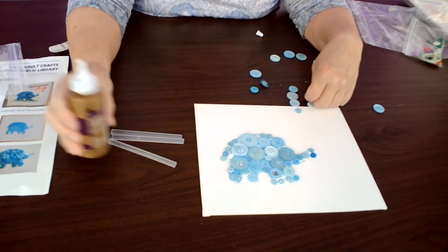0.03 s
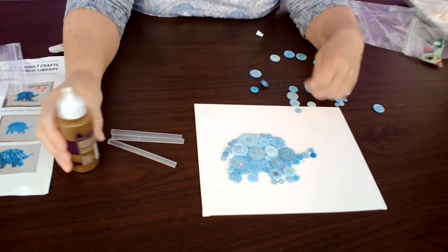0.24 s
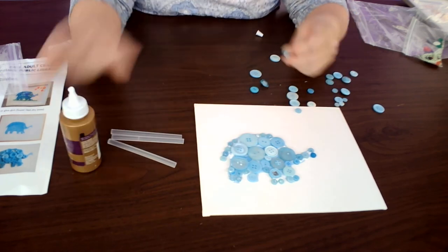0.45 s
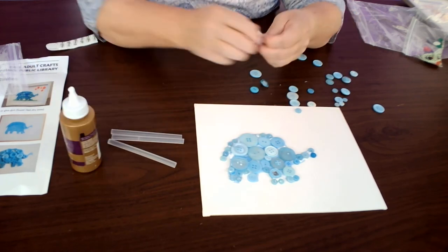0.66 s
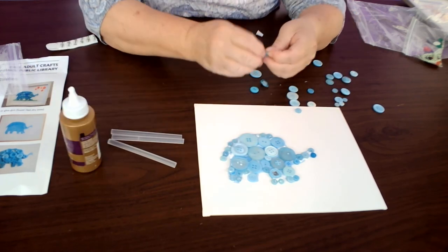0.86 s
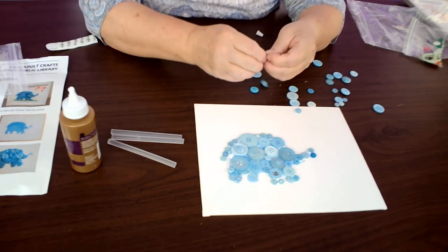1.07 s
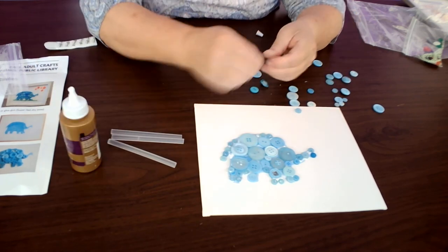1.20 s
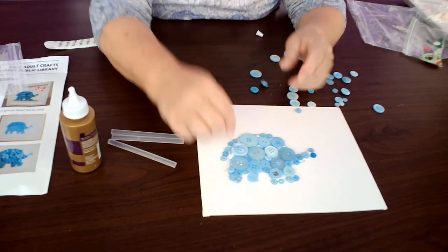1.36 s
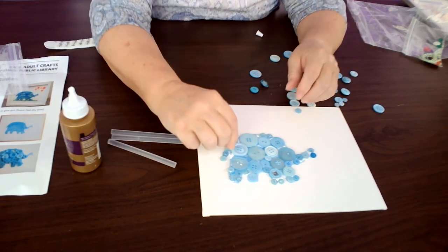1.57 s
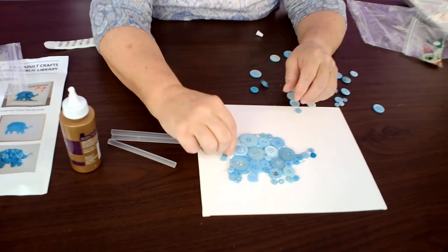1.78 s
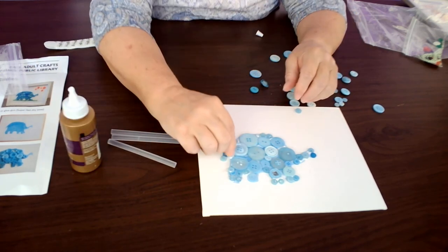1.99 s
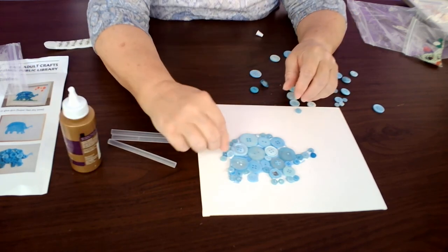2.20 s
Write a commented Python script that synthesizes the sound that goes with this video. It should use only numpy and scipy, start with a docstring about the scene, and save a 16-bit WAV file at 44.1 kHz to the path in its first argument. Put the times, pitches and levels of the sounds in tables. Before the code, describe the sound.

A plastic bottle rattles lightly from 0 to 0.06 seconds, then hits a wooden table at 0.23 with a loud, bright, slightly clipped knock, rocking to rest by 0.36 with a short room tail. Fingers brush off; a tiny button tick comes at 0.57. A faint forearm slide spans 1.15-1.45, soft thuds at 1.47 and 2.17, a tick at 2.02. Quiet hum, hiss and thin high whine continue.

```python
"""A plastic glue bottle rattles in the hand, is set down hard on a wooden table and rocks to rest. Fingers
brush off it, a forearm slides over the table top, small buttons tick and a wrist thuds. A quiet room hums;
the camera whines faintly. Blows ring sine modes of the table; plastic, skin and cloth are shaped noise;
ticks are short rings; the room adds a decaying tail.
"""
import sys
import numpy as np
from scipy import signal
from scipy.fft import rfft, irfft, next_fast_len
from scipy.io import wavfile
from scipy.ndimage import map_coordinates

SR = 44100
rng = np.random.default_rng(int(sys.argv[2]) if len(sys.argv) > 2 else 0)


def voltage_ratio(decibels):
    """Convert decibels (scalar or array-like) to amplitude ratios, 20 dB per decade."""
    exponent = np.asarray(decibels, float) / 20
    return 10 ** exponent


def persist_wave(psi):
    """Save psi, clipped to +-1, as 16-bit WAV."""
    counts = np.round(np.clip(psi, -1, 1) * 32767).astype(np.int16)
    wavfile.write(sys.argv[1], SR, np.atleast_2d(counts).T)


N = 99225
TIME_S = np.arange(N) / SR


def unit(x):
    """Normalization: scale a signal to rms 1."""
    return x / np.sqrt(np.mean(x ** 2) + 1e-20)


def along(points, hz):
    """Logarithmic pitch scale: interpolate (hz, value) points along it."""
    point_hz, values = np.transpose(points)
    return np.interp(np.log(hz + 1), np.log(point_hz + 1), values)


def filtered(x, response):
    """Linear filtering: multiply the spectrum of x by a function of frequency."""
    size = next_fast_len(N + SR // 2)
    spectrum = rfft(x, size) * response(np.fft.rfftfreq(size, 1 / SR))
    return irfft(spectrum, size)[:N]


def noise(spectrum):
    """Spectral shaping: white noise takes a coloured spectrum and rms 1."""
    return unit(filtered(rng.standard_normal(N), lambda hz: voltage_ratio(along(spectrum, hz))))


def wobble(rate_hz):
    """Slow random modulation: a smooth curve through rate_hz random knots a second."""
    knots = rng.standard_normal(int(N * rate_hz / SR) + 4)
    return map_coordinates(knots, [TIME_S * rate_hz])


def decay(start_s, t60_s, rise_s=0.00015):
    """Exponential damping: silence, a quick rise, then a fall of 60 dB in t60_s."""
    t = np.clip(TIME_S - start_s, 0, None)
    return (1 - np.exp(-t / rise_s)) ** 2 * voltage_ratio(-60 * t / t60_s)


# hard plastic contacts: start_s [s], level_db [dB]
RATTLES = [(.0005, -48), (.006, -23.5), (0.0194, -20.5), (0.037, -24.5), (0.048, -37), (.06, -24),
           (0.23, -15), (0.234, -31.5), (0.238, -20)]
# colour of the plastic: pitch_hz [Hz], level_db [dB per Hz, relative]
PLASTIC = [(120, -24), (200, 7.5), (506, -4.5), (575, 2), (874, 7.5), (1680, -2), (2510, 4.5), (2850, 2),
           (5300, -12), (7480, -2.5), (10200, -28.5), (15500, -55)]


def bottle_rattle():
    """Impact excitation: each contact shakes the plastic into a short noisy burst."""
    rise_s, t60_s = 0.0012, 0.014
    bursts = sum(voltage_ratio(level_db) * decay(start_s, t60_s, rise_s) for start_s, level_db in RATTLES)
    return noise(PLASTIC) * bursts


# colour of the base slap: pitch_hz [Hz], level_db [dB per Hz, relative]
SLAP = [(1470, -21), (2500, 1.5), (4820, -16), (6690, -6), (9080, -27), (12100, -27), (13700, -32),
        (15500, -34)]


def base_slap():
    """Broadband impact: the base meets the wood in one bright, fast-decaying burst."""
    start_s, level_db, t60_s = 0.2277, -16, 0.009
    return noise(SLAP) * voltage_ratio(level_db) * decay(start_s, t60_s)


# blows on the table: start_s [s], level_db [dB, size of the impulse], contact_s [s]
BLOWS = [(.035, -40, 0.0035), (.2277, -12.5, 0.00033), (0.2297, -21, 0.00039), (0.2328, -19, 0.0012),
         (0.2371, -22, 0.00057), (0.2782, -24, 0.0015), (.301, -29, 0.0016), (0.342, -37, 0.00064),
         (.356, -40.5, .001), (1.103, -55, 0.00071), (1.284, -52.5, 0.00084), (1.476, -59, 0.001),
         (2.17, -47, 0.00063), (2.177, -58, 0.00071)]
# modes of the table top: pitch_hz [Hz], level_db [dB], t60_s [s]
TABLE_MODES = [(201, -22, 0.3), (256, -25, 0.027), (296, 6, 0.027), (365, -8, 0.25), (439, 13, 0.019),
               (579, 9.5, 0.017), (670, 4, 0.039), (793, -12, 0.057), (1197, 4, .03), (1467, -8, 0.024),
               (1880, -14.5, 0.06), (2520, -35, 0.017), (3070, -40, .015)]


def table_top():
    """Modal synthesis: half-sine pushes ring damped modes; a longer contact is duller."""
    force = 0
    for start_s, level_db, contact_s in BLOWS:
        progress = np.clip((TIME_S - start_s) / contact_s, 0, 1)
        force = force + voltage_ratio(level_db) * np.sin(np.pi * progress) / (contact_s * SR)
    t = TIME_S[:SR // 2]
    lowest_mode = (144, -3, 0.6)  # pitch_hz, level_db, t60_s
    flip_hz = 290  # modes above this swing the opposite way
    ring = 0
    for pitch_hz, level_db, t60_s in [lowest_mode] + TABLE_MODES:
        mode = voltage_ratio(level_db - 60 * t / t60_s) * np.sin(2 * np.pi * pitch_hz * t)
        ring = ring + np.sign(flip_hz - pitch_hz) * mode
    return signal.fftconvolve(force, ring)[:N]


# button ticks: start_s [s], level_db [dB], pitch_hz [Hz], t60_s [s]
TICKS = [(.3185, -44.5, 9600, 0.0053), (.5725, -40, 6240, 0.0074), (0.575, -49, 7300, 0.011),
         (2.0245, -41.5, 6900, 0.0059), (2.206, -61.5, 6200, 0.038)]


def buttons():
    """Damped resonance: each tick is a short high ring in a spit of noise."""
    spit = 0.4 * noise([(2000, -26), (4000, 19), (11000, -1), (14000, -17)])
    ticks = 0
    for start_s, level_db, pitch_hz, t60_s in TICKS:
        ring = np.sin(2 * np.pi * pitch_hz * (TIME_S - start_s))
        ticks = ticks + voltage_ratio(level_db) * decay(start_s, t60_s) * (ring + spit)
    return ticks


def rubbing(strokes, spectrum):
    """Friction: grainy noise swells, holds and fades with each stroke."""
    shape = 0
    for start_s, rise_s, hold_s, fall_s, level_db in strokes:
        corners_s = start_s + np.cumsum([0, rise_s, hold_s, fall_s])
        shape = shape + voltage_ratio(level_db) * np.interp(TIME_S, corners_s, [0, 1, 1, 0]) ** 1.08
    grain_db = 2.5 * wobble(150)
    return shape * unit(voltage_ratio(grain_db) * noise(spectrum))


# finger strokes: start_s [s], rise_s [s], hold_s [s], fall_s [s], level_db [dB]
BRUSHES = [(.36, 0.0078, 0.017, 0.03, -46.5)]
# colour of the fingers: pitch_hz [Hz], level_db [dB per Hz, relative]
FINGER = [(1470, -39), (2500, -3.5), (3390, -13), (4300, -16), (6300, -1), (7980, -7), (8610, -1.5),
          (15500, -37)]


def finger_brush():
    """Skin friction: fingers leave the bottle with a bright, brief rub."""
    return rubbing(BRUSHES, FINGER)


# forearm strokes: start_s [s], rise_s [s], hold_s [s], fall_s [s], level_db [dB]
SLIDES = [(1.14, 0.071, 0.034, 0.22, -50)]
# colour of the forearm: pitch_hz [Hz], level_db [dB per Hz, relative]
ARM = [(120, -51), (200, -23), (219, -25), (339, 3.5), (385, -17), (554, -6), (630, -14), (940, -6),
       (1150, -14.5), (1880, -13), (2800, -16.5), (3240, -13.5), (5300, -22), (7480, -18), (9480, -36),
       (15500, -41)]


def forearm_slide():
    """Sliding friction: the forearm on the table top gives a long, low rub."""
    return rubbing(SLIDES, ARM)


# handling strokes: start_s [s], rise_s [s], hold_s [s], fall_s [s], level_db [dB]
HANDLING = [(-.02, 0.0072, 0.051, 0.067, -40.5), (.42, 0.051, 0.027, 0.4, -57),
            (.68, 0.031, 0.043, 0.07, -62.5), (1.08, 0.027, .03, .04, -67), (1.46, 0.019, .03, .05, -65.5)]


def handling():
    """Friction on plastic: handling noise takes the colour of the bottle."""
    return rubbing(HANDLING, PLASTIC)


# soft thuds: start_s [s], rise_s [s], hold_s [s], fall_s [s], level_db [dB]
NUDGES = [(1.22, 0.045, 0.027, 0.032, -48.5), (1.468, 0.0061, 0.029, 0.045, -51),
          (2.172, 0.0033, 0.024, 0.034, -50)]
# colour of the board: pitch_hz [Hz], level_db [dB per Hz, relative]
BOARD = [(250, -34), (350, 10.5), (500, 10), (750, 9.5), (1000, -12), (1600, -38), (4000, -89)]


def board_nudges():
    """Soft contact: slow pushes on the board give dull thuds with little treble."""
    return rubbing(NUDGES, BOARD)


# scuffs: start_s [s], rise_s [s], hold_s [s], fall_s [s], level_db [dB]
SCUFFS = [(.45, .03, 0.026, 0.035, -56.5), (1.18, 0.048, 0.032, 0.039, -53.5),
          (1.38, 0.024, 0.025, .03, -60)]
# colour of the scuffs: pitch_hz [Hz], level_db [dB per Hz, relative]
SCUFF = [(1100, -36), (1500, -2.5), (1850, -5), (2300, -11), (2800, -21), (3350, -11.5), (3900, -26),
         (5000, -48)]


def scuffs():
    """Band-limited friction: faint scuffs lie mostly in the middle register."""
    return rubbing(SCUFFS, SCUFF)


# decay of the room: pitch_hz [Hz], t60_s [s]
ROOM_DECAY = [(60, .25), (140, 0.87), (500, 0.45), (1500, 0.69), (2500, 0.38), (4000, 0.64), (9000, 0.5)]
# level of the room tail: pitch_hz [Hz], level_db [dB]
ROOM_LEVEL = [(150, -16.5), (500, -14.5), (1500, -9), (6000, -13)]


def room(x):
    """Reverberation: each frequency of a delayed noise tail dies at its own speed."""
    delay_s = 0.008
    hz, t, grid = signal.stft(rng.standard_normal(SR), SR, nperseg=512)
    fall = voltage_ratio(-60 * t / along(ROOM_DECAY, hz)[:, None])
    tail = signal.istft(grid * fall, SR, nperseg=512)[1]
    delayed = np.pad(x, (round(delay_s * SR), 0))
    wet = signal.fftconvolve(delayed, tail / np.linalg.norm(tail))[:N]
    return filtered(wet, lambda hz: voltage_ratio(along(ROOM_LEVEL, hz)))


# hum bands: pitch_hz [Hz], level_db [dB], width_hz [Hz, at half amplitude]
HUM = [(97.5, -72, 3.9), (324, -64, 90), (493, -61, 4.7), (570, -70.5, 52), (970, -65.5, 86),
       (1593, -73, 30)]


def hum():
    """Narrow-band noise: sharp resonances of white noise make wavering hums."""
    total = 0
    for pitch_hz, level_db, width_hz in HUM:
        white = rng.standard_normal(N)
        band = filtered(white, lambda hz: 1 / (1 + (2 * (hz - pitch_hz) / width_hz) ** 2))
        total = total + voltage_ratio(level_db) * unit(band)
    return total


# course of the treble hiss: time_s [s], level_db [dB, 3 dB above the sounding level]
HISS_LEVEL = [(0.1, -62.5), (0.66, -66), (0.81, -69.5), (1.08, -73), (1.31, -56.5), (1.55, -75.5),
              (2.25, -70.5)]
# colour of the hiss: pitch_hz [Hz], level_db [dB per Hz, relative]
HISS_BAND = [(4500, -39), (6000, -0.5), (7500, 1.5), (8800, -11), (11000, -58)]


def hiss():
    """Amplitude modulation: a band of treble noise rises and falls in level."""
    return voltage_ratio(np.interp(TIME_S, *np.transpose(HISS_LEVEL)) - 3) * noise(HISS_BAND)


# colour of the room air: pitch_hz [Hz], level_db [dB per Hz, relative]
AIR = [(12, -53), (20, -23), (32, -21), (59, -11.5), (149, -19.5), (203, -20), (345, -20.5), (443, -16.5),
       (482, -15), (554, -17.5), (942, -20), (1840, -25.5), (5780, -38.5), (7860, -43.5), (15800, -53)]


def room_air():
    """Broadband noise floor: the air wavers and slowly sinks."""
    start_db, sink_db_per_s = -52, 2.4
    return voltage_ratio(start_db - sink_db_per_s * TIME_S + 0.76 * wobble(7.01)) * noise(AIR)


def camera_whine():
    """Gated harmonic tone: the phase jumps half a cycle at each frame; a clock tone wavers."""
    pitch_hz, frame_hz, frame_start_s = 4985.5, 23.976, 0.0385
    on_share = 0.61  # sounding part of each frame
    frame = (TIME_S - frame_start_s) * frame_hz
    phase = 2 * np.pi * pitch_hz * TIME_S + np.pi * np.floor(frame)
    harmonics_db = [-74.5, -76.5, -80]
    tone = sum(voltage_ratio(db) * np.sin((k + 1) * phase) for k, db in enumerate(harmonics_db))
    clock = voltage_ratio(-82 + 3.3 * wobble(30)) * np.sin(2 * np.pi * 8000 * TIME_S)
    return (frame % 1 < on_share) * tone + clock


def scene():
    """Superposition: the microphone's low cut thins the deep bass of near sounds and room tail."""
    near = bottle_rattle() + base_slap() + table_top() + buttons()
    near = near + finger_brush() + forearm_slide() + handling() + board_nudges() + scuffs()
    low_cut = signal.butter(4, 122, "high", fs=SR, output="sos")  # corner in Hz
    foreground = signal.sosfilt(low_cut, near + room(near))
    background = hum() + hiss() + room_air() + camera_whine()
    return (foreground + background)[None]


def band_limit(x):
    """A steep low-pass at the top of the band."""
    return signal.sosfilt(signal.butter(12, 16610, fs=SR, output="sos"), x)


def record(dry):
    """Saturation: the converter adds an offset, clips the loudest swing and has a band limit."""
    offset, clip, knee = 0.0056, 0.705, 20  # a higher knee clips more abruptly
    x = dry[0] + offset
    clipped = x / (1 + np.abs(x / clip) ** knee) ** (1 / knee)
    limited = filtered(clipped - offset, lambda hz: hz < 15750) + offset
    return band_limit(limited[None])


dry = scene()
out = record(dry)
persist_wave(out)
```